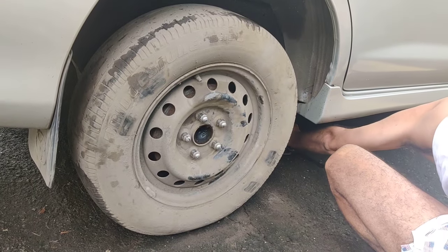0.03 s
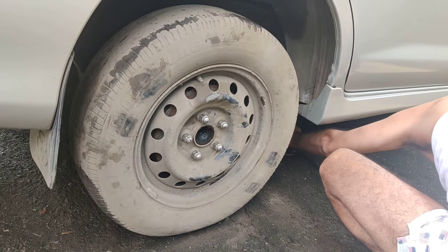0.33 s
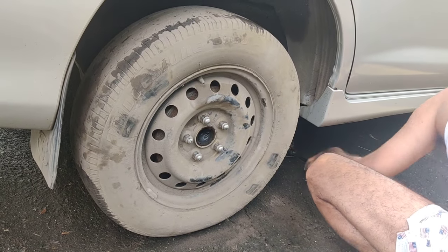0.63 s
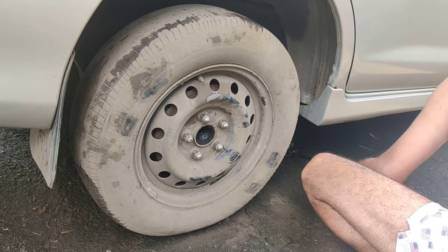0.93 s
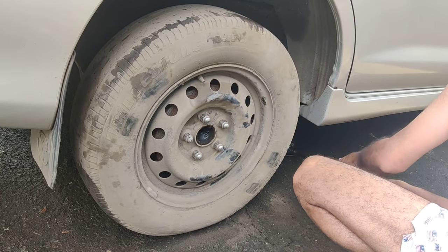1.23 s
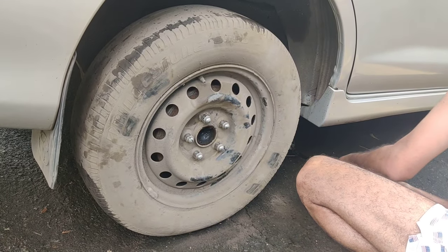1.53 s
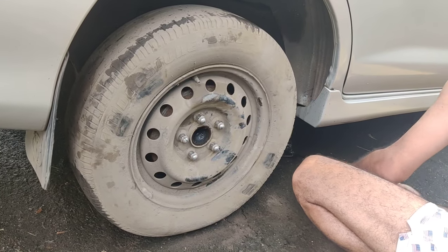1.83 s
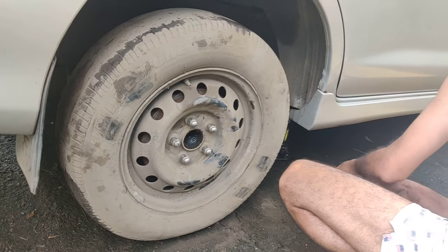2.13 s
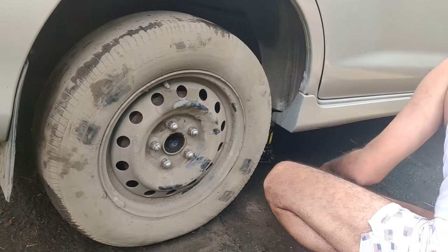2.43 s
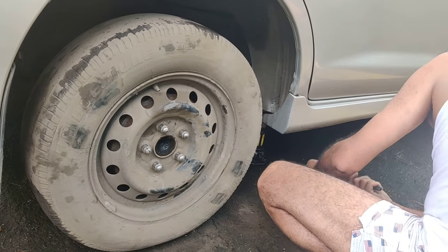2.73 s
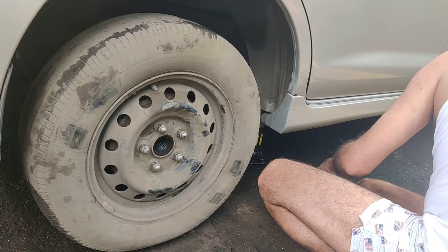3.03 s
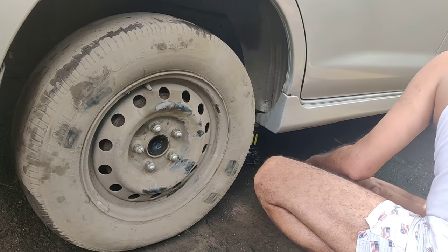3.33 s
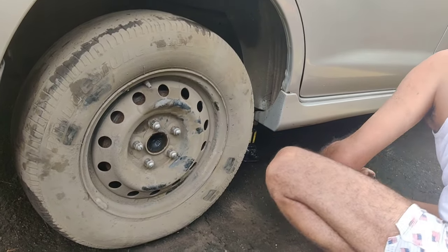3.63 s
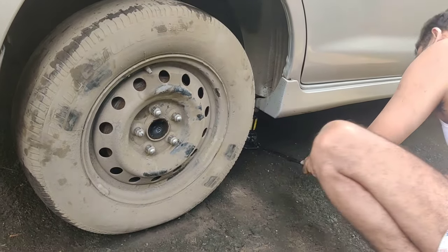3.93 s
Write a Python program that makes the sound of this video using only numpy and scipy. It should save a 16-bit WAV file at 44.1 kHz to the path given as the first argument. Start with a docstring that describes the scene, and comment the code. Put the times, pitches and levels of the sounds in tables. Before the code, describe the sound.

Irregular metallic clicks from a hand-worked car jack, with a motor humming in the street behind.

```python
"""Car jack at the roadside

A steel car jack is worked by hand beside a parked car: its handle knocks and slips in short, bright
clicks that ring the steel and echo off the underbody. A motor vehicle drones nearby, tyres hiss briefly,
road noise fades into the distance over the steady town, and a small bird gives two rising whistles."""
import sys
import numpy as np
from scipy import signal
from scipy.fft import rfft, irfft
from scipy.io import wavfile
from scipy.ndimage import uniform_filter1d

SR = 44100
rng = np.random.default_rng(int(sys.argv[2]) if len(sys.argv) > 2 else 0)


def generate_wav(signal):
    """Clip the signal to [-1, 1] and save it as 16-bit WAV at the path in sys.argv[1]."""
    frames = np.transpose(np.atleast_2d(signal))
    scaled = np.clip(frames, -1, 1) * 32767
    pcm = np.round(scaled).astype(np.int16)
    wavfile.write(sys.argv[1], SR, pcm)


N = 176400
STREET_LAG_S = np.array([[0], [0.000406]])  # left, right: the street reaches the left side first


def undb(db):
    """Decibels to gain."""
    return 10 ** (np.asarray(db) / 20)


def unit(x):
    """Scale to rms 1."""
    return x / np.sqrt(np.mean(x ** 2))


def curve(rows):
    """An automation line through (t/s, value) rows."""
    return np.interp(np.arange(N) / SR, *np.array(rows).T)


def on_log(rows, hz):
    """Read (f/Hz, value) rows on a log-frequency axis."""
    f, values = np.array(rows).T
    return np.interp(np.log(np.maximum(hz, 1)), np.log(f), values)


def colour(x, rows):
    """Zero-phase EQ from (f/Hz, level/dB) rows."""
    size = x.shape[-1]
    return irfft(rfft(x) * undb(on_log(rows, np.fft.rfftfreq(size, 1 / SR))), size)


def causal_eq(x, rows, size=1024):
    """Minimum-phase EQ from (f/Hz, level/dB) rows: nothing rings ahead of an attack."""
    cepstrum = irfft(np.log(undb(on_log(rows, np.fft.rfftfreq(size, 1 / SR)))))
    folded = cepstrum * np.r_[1, np.full(size // 2 - 1, 2), np.zeros(size // 2)]
    return signal.lfilter(irfft(np.exp(rfft(folded))), 1, x)


def wander(rate_hz):
    """Smooth random modulation with rms 1."""
    hold = int(SR / rate_hz)
    steps = np.repeat(rng.standard_normal(N // hold + 1), hold)
    return unit(uniform_filter1d(uniform_filter1d(steps, hold), hold)[:N])


def echoes(x, t60_s, top_hz=6900):
    """Diffuse reflections, dulled and different on each side."""
    t = np.arange(SR // 2) / SR
    tail = rng.standard_normal((2, len(t))) * np.exp(-np.log(1000) * t / t60_s)
    tail *= 1 - np.exp(-t / 0.002)
    wet = signal.fftconvolve(x, tail / np.sqrt(np.sum(tail ** 2) / 2), axes=1)[:, :N]
    return signal.sosfilt(signal.butter(2, top_hz, fs=SR, output="sos"), wet)


def street_spectrum(rows):
    """The spectrum of a stereo noise bed, narrow in the bass and wide in the treble."""
    # likeness of left and right: f/Hz, correlation
    likeness = [(30, 0.83), (150, 1), (350, 0.9), (700, 0.22), (3000, 0.14)]
    f = np.fft.rfftfreq(N, 1 / SR)
    alike = np.clip(on_log(likeness, f), 0, .995)
    mid, side = rfft(rng.standard_normal((2, N)))
    both = np.sqrt(1 + alike) * mid + np.sqrt(1 - alike) * side * np.array([[1], [-1]])
    both *= np.exp(-2j * np.pi * f * STREET_LAG_S) * undb(on_log(rows, f))
    return both / np.std(irfft(both, N))


def traffic(road_db=-27.5, town_db=-30, flicker_db=1.3):
    """Road noise recedes, treble first, over the steady town; each octave flickers a little."""
    # tone of the receding road: f/Hz, level/dB
    road_eq = [(100, -7.5), (170, 1), (290, -2.5), (420, -8.5), (520, -6.5), (640, -14.5), (1500, -15.5),
               (3200, -19), (4300, -28), (10000, -39), (16000, -57)]
    # tone of the town bed: f/Hz, level/dB
    town_eq = [(20, -18.5), (40, 5), (58, -2), (135, -3.5), (240, -18), (350, -13.5), (460, -21),
               (680, -22.5), (2000, -26), (4100, -41), (6400, -48), (16000, -58)]
    # swell of the town's bass: t/s, level/dB
    rumble_db = [(0, 0.5), (1.5, 3.5), (2.5, -1.5), (3.2, 2), (3.55, 0), (4, -5.5)]
    t, f = np.arange(N) / SR, np.fft.rfftfreq(N, 1 / SR)
    road, town, out = street_spectrum(road_eq), street_spectrum(town_eq), 0
    fade_db = 6 * np.maximum(t - 0.7, 0)
    treble_loss_db = 10 * (1 - np.exp(-t / 0.31))  # at 10 kHz
    octave = np.clip(np.log2(np.maximum(f, 1) / 50), 0, 8)
    for k in range(9):
        hz = 50 * 2 ** k
        band = np.maximum(1 - abs(octave - k), 0)
        road_band = irfft(road * band, N) * undb(road_db - fade_db - treble_loss_db * np.sqrt(hz / 1e4))
        town_band = irfft(town * band, N) * undb(town_db + curve(rumble_db) / (1 + (hz / 300) ** 2))
        out += undb(flicker_db * wander(9.02)) * (road_band + town_band)
    return out


def tyre_hiss(level_db=-52, hold_s=0.26, fade_db_per_s=32):
    """Tyres on the road hiss briefly and die away."""
    # tone of the tyres: f/Hz, level/dB
    hiss_eq = [(3000, -14), (4800, 2), (7200, -2), (12400, -11), (16000, -28)]
    fade_db = fade_db_per_s * np.maximum(np.arange(N) / SR - hold_s, 0)
    return unit(colour(rng.standard_normal((2, N)), hiss_eq)) * undb(level_db - fade_db)


def bird(from_hz=5100, to_hz=6600, rise_s=0.022):
    """Each whistle sweeps up and holds its top note, blurred by distant walls."""
    # whistles: t/s, length/s, level/dB
    whistles = [(2.468, 0.17, -59), (2.756, 0.18, -55.5)]
    t, out = np.arange(N) / SR, np.zeros(N)
    for start, length, db in whistles:
        age = np.clip(t - start, 0, length)
        hz = (to_hz + (from_hz - to_hz) * np.exp(-age / rise_s)) * (1 + 0.012 * wander(240))
        envelope = np.minimum(age / .015, 1) * np.sqrt(1 - age / length)
        out += undb(db) * envelope * np.sin(2 * np.pi * np.cumsum(hz) / SR)
    both = np.array([out, out])
    return both + undb(2) * echoes(both, t60_s=0.29)


def engine(overtone_fade_db_per_s=5, hum_ratio=2.365, hum_octave_db=-16.5):
    """A slowly rising drone with wavering overtones, a second hum tied to its speed, a fading whine."""
    # pitch of the drone: t/s, f/Hz
    drone_hz = [(0, 71.5), (.6, 74.5), (2.1, 75), (3.0, 77), (4, 78)]
    # fader of its fundamental: t/s, level/dB
    drone_db = [(0, -28), (.85, -27.5), (.96, -21), (1.1, -25), (1.7, -27.5), (2.18, -25.5), (2.32, -24.5),
                (2.7, -23), (3.1, -27.5), (3.38, -27), (3.65, -32.5), (4, -41.5)]
    # its overtones: harmonic number, level/dB
    overtones = [(2, -37), (3, -41.5), (4, -36.5)]
    # swells of the second hum: t/s, level/dB
    hum_db = [(0, -39), (.17, -24.5), (.3, -36), (.55, -37), (.67, -26.5), (.85, -26.5), (.93, -35),
              (1.14, -36.5), (1.2, -26), (1.28, -23.5), (1.33, -36), (1.6, -38.5), (1.69, -29.5),
              (1.94, -33.5), (2.15, -26.5), (2.53, -28.5), (2.72, -36.5), (3.06, -44), (3.16, -33),
              (3.35, -28.5), (3.48, -47), (3.6, -38), (3.85, -30), (4, -46)]
    # narrow noise bands of the whine: f/Hz, width/Hz, level/dB
    whine_bands = [(754, 59, -39), (1528, 38, -47.5)]
    # fader over both bands: t/s, level/dB
    whine_db = [(0, 6), (.45, -6), (.68, 2.5), (1.15, -6.5), (2.2, -10.5), (4, -15.5)]
    t, f = np.arange(N) / SR, np.fft.rfftfreq(N, 1 / SR)
    hz = curve(drone_hz)
    cycles = np.cumsum(hz * (1 + 0.0033 * wander(8.08))) / SR
    phase = 2 * np.pi * (cycles - hz * STREET_LAG_S)
    out = undb(curve(drone_db) + 1.35 * wander(22.4)) * np.sin(phase)
    for harmonic, db in overtones:
        gain = undb(db - overtone_fade_db_per_s * t + 2.3 * wander(6.4))
        out += gain * np.sin(harmonic * phase + .5 * wander(8.3))
    hum_phase = hum_ratio * phase + 0.38 * wander(13)
    hum = np.sin(hum_phase) + undb(hum_octave_db) * np.sin(2 * hum_phase + wander(14))
    out = np.sqrt(2) * (out + undb(curve(hum_db)) * hum)  # the tones' levels are rms
    for centre, width, db in whine_bands:
        whine = irfft(rfft(rng.standard_normal((2, N))) / (1 + ((f - centre) / width * 2) ** 2), N)
        out += unit(whine) * undb(db + curve(whine_db))
    return out


def burst(x):
    """Give each channel of a transient the energy of 10 ms at rms 1."""
    return x / np.sqrt(np.sum(x ** 2, axis=-1, keepdims=True) / (SR / 100))


def steel_ring(t, noise, ring_hz, contact_s=0.0044, rattle_db=-5, favour_db=10.5, detune=0.012):
    """A blow and a brief rattle ring the steel; the grip pulls one mode to ring_hz and favours it."""
    # modes of the jack: f/Hz, level/dB, t60/s
    steel_modes = [(4725, 5.5, 0.024), (4980, -0.5, 0.018), (5300, 3.5, 0.028), (6525, 6, 0.021),
                   (7000, 1, 0.015)]
    rest_hz, mode_db, t60 = np.array(steel_modes).T[:, :, None]
    rattle = noise * np.exp(-(t / contact_s) ** 2) * (1 - np.exp(-t / 0.00068))
    blow = burst(1. * (t == 0)) + undb(rattle_db) * burst(rattle)
    nearest = abs(rest_hz - ring_hz) == np.min(abs(rest_hz - ring_hz))
    hz = np.where(nearest, ring_hz, rest_hz * (1 + detune * rng.standard_normal(rest_hz.shape)))
    scatter_db = 2.5 * rng.standard_normal((2, len(steel_modes), 1))
    gains = undb(mode_db + favour_db * nearest - scatter_db)
    modes = gains * np.sin(2 * np.pi * (rng.random(gains.shape) + hz * t))
    ring = np.sum(modes * np.exp(-np.log(1000) * t / t60), axis=1) * (1 - np.exp(-t / 0.00032))
    return burst(signal.fftconvolve(blow, ring, axes=1)[:, :len(t)])


def jack(trim_db=-3.5, knock_trim_db=3.5, tick_trim_db=-3.5, underbody_db=-7):
    """Each slip rings the steel, knocks the frame and ticks at the contact, some bright, some dull."""
    # slips, ahead of the trims: t/s, level/dB, knock/dB, tick/dB, tick's treble shelf/dB, ring f/Hz
    clicks = [(0.7212, -48.5, 12, 9, -8, 5270), (1.0802, -40.5, 2.5, -11, -3, 4970),
              (1.1164, -38, 5, 4, -8, 4780), (1.428, -46, 6.5, 4, -9, 4680), (2.094, -50, 8, 10, -4, 5230),
              (2.214, -42.5, 2.5, 10, 4, 4600), (2.3543, -44.5, -3, 6, 2, 4770),
              (2.4018, -47, -2, 1, -4, 4940), (2.4433, -50.5, 9, -10, -4, 5270),
              (2.4956, -50.5, 9, -12, -4, 5240), (2.944, -40.5, 0.5, 7.5, -11, 4540),
              (2.9799, -48.5, 12.5, 5, -4, 4980), (2.9840, -36.5, -1, -12, 4, 4980),
              (2.9942, -44, 8, -6, -2, 5200), (3.036, -53.5, 13, 5, 0, 5230),
              (3.132, -62.5, -3.5, 15, 6, 5030), (3.1746, -46, -6, -4, -5, 6500),
              (3.214, -53.5, 11.5, -10, -3, 5230), (3.3614, -40, 3.5, -0.5, 6, 5300),
              (3.4945, -29, -6.5, 0, -7, 6540), (3.499, -37, 0, -14.5, -4, 4700),
              (3.7214, -49, 1.5, 6, 2, 4850), (3.7619, -32.5, -4.5, 1, 6, 4830),
              (3.7755, -51, 15, -4, -2, 4650), (3.8, -41, -1.5, -11, -5, 5250),
              (3.8551, -47.5, 5, -10, -5, 5300)]
    # dull knock of the frame: f/Hz, level/dB
    knock_eq = [(300, -37), (900, -2), (1750, -0.5), (2650, 1.5), (3300, -6), (4100, -11), (6000, -40)]
    # bright tick at the contact: f/Hz, level/dB
    tick_eq = [(2000, -0.5), (5000, -8), (6700, 1), (8300, -7.5), (9350, 1.5), (10400, -1.5), (11500, -10),
               (15200, -13)]
    out, size = np.zeros((2, N + SR)), 4096
    t = np.arange(size) / SR
    knock_envelope = np.exp(-t / 0.0081) * (1 - np.exp(-t / 0.0014))
    tick_envelope = (np.exp(-t / 0.0038) + undb(-20) * np.exp(-t / 0.02)) * (1 - np.exp(-t / 0.00048))
    for start, db, knock_db, tick_db, shelf_db, ring_hz in clicks:
        rattle_noise, knock_noise, tick_noise = rng.standard_normal((3, 2, size))
        ring = steel_ring(t, rattle_noise, ring_hz)
        knock = burst(colour(knock_noise, knock_eq) * knock_envelope)
        tick = burst(colour(tick_noise, tick_eq) * tick_envelope)
        tick = causal_eq(tick, [(9500, 0), (12500, shelf_db)])
        click = ring + undb(knock_trim_db + knock_db) * knock + undb(tick_trim_db + tick_db) * tick
        i = int(start * SR)
        out[:, i:i + size] += undb(db + trim_db) * click
    direct = out[:, :N]
    return direct + undb(underbody_db) * echoes(direct, t60_s=0.15)


def scene():
    """The jack close by; behind it the bird and the street, which is a touch louder on the right."""
    street_pan = undb(np.array([[-0.53], [0.53]]) / 2)
    return jack() + (engine() + traffic() + tyre_hiss()) * street_pan + bird()


def record(dry):
    """Each microphone port adds its own resonance; the deepest bass and the very top are cut."""
    # resonance of the left port: f/Hz, level/dB
    left_port = [(2000, 1), (4100, 1), (4550, 8), (4900, 15), (5250, 12), (5700, -2), (6400, -3)]
    # resonance of the right port: f/Hz, level/dB
    right_port = [(2000, -0.5), (3200, -2), (4700, -0.5), (5500, 5.5), (7200, 6), (8200, 1), (10000, -2)]
    heard = np.array([causal_eq(dry[0], left_port), causal_eq(dry[1], right_port)])
    heard = signal.sosfilt(signal.butter(2, 20, "high", fs=SR, output="sos"), heard)
    return signal.sosfilt(signal.ellip(10, .2, 80, 15900, fs=SR, output="sos"), heard)


dry = scene()
out = record(dry)
generate_wav(out)
```